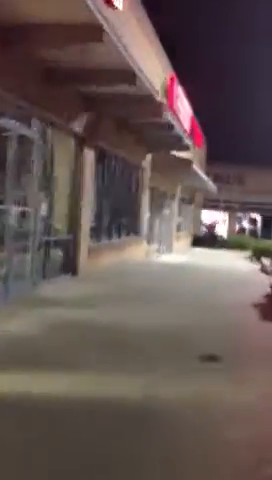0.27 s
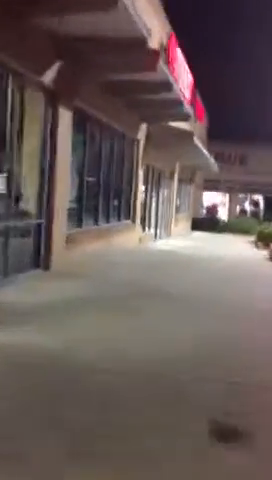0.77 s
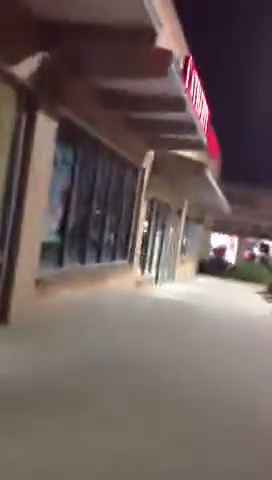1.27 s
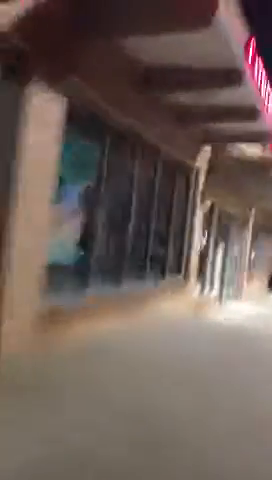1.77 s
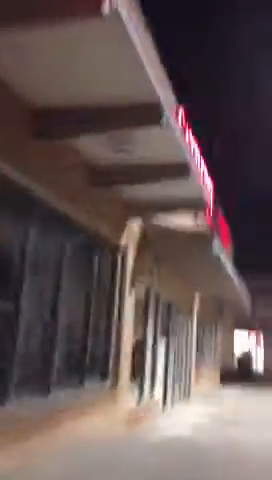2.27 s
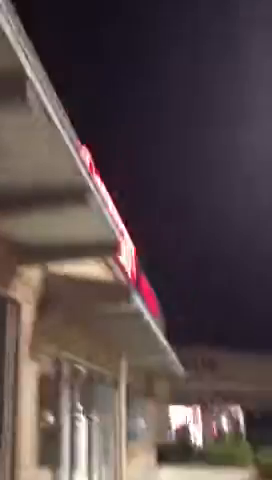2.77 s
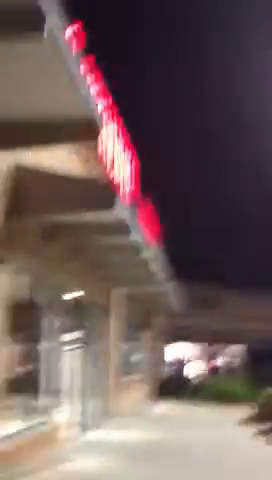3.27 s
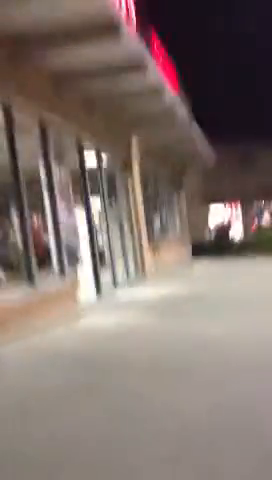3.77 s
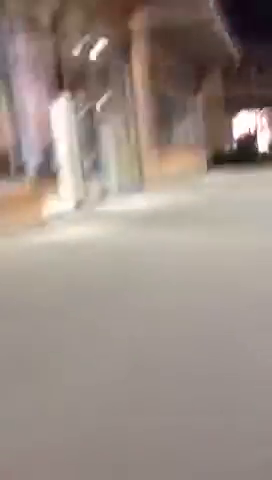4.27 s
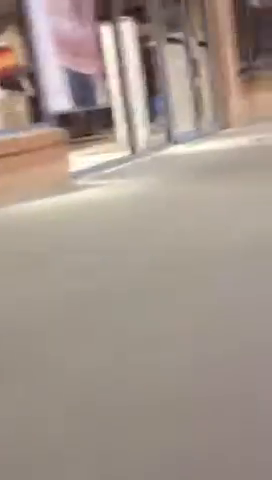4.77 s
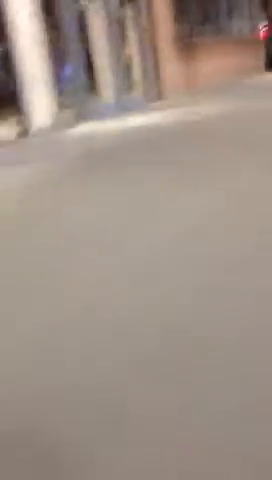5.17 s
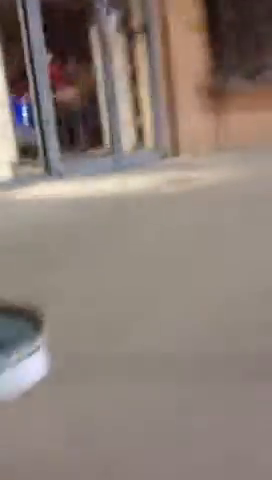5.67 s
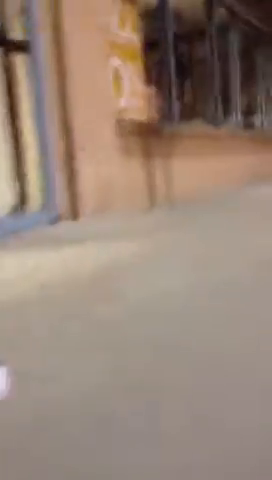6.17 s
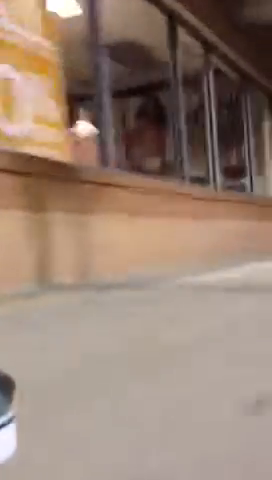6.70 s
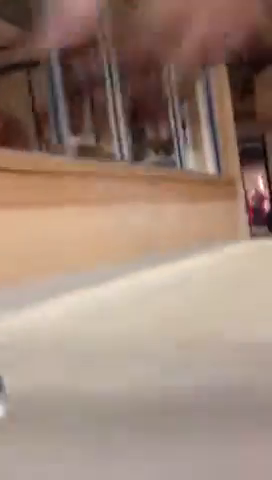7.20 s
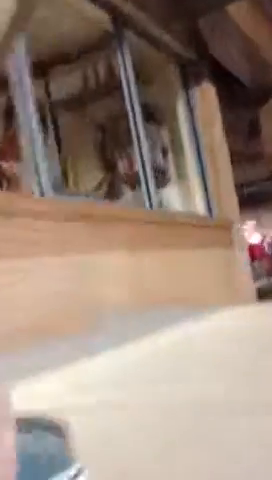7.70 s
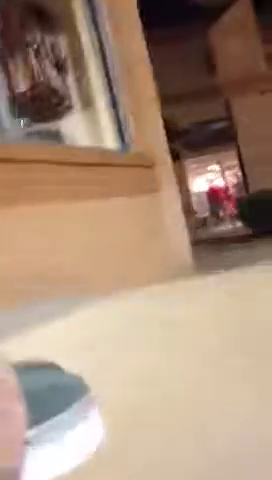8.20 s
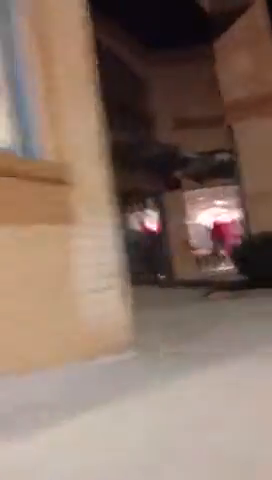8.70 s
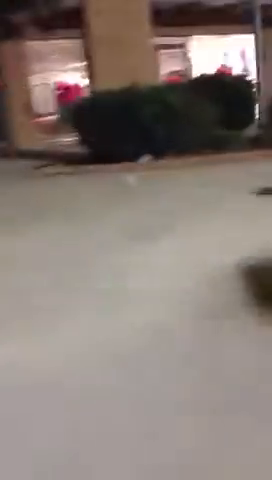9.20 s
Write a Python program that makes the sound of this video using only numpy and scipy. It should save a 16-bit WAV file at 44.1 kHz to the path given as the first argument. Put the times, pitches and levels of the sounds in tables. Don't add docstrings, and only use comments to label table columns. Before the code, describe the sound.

Close, hollow skateboard rolling on a concrete walkway, broken by paired clacks about every half second, with gritty pebble snaps and bright wheel hiss midway.

```python
import sys
import numpy as np
from scipy import signal
from scipy.fft import rfft, irfft, next_fast_len
from scipy.io import wavfile
from scipy.ndimage import uniform_filter1d, minimum_filter1d, map_coordinates

SR = 44100
rng = np.random.default_rng(int(sys.argv[2]) if len(sys.argv) > 2 else 0)


def inscribe(sig):
    pcm = np.round(np.clip(np.atleast_2d(sig).T, -1, 1) * 32767)
    wavfile.write(sys.argv[1], SR, pcm.astype(np.int16))


def gain_from_db(level_db):
    decades = np.asarray(level_db, float) / 20
    return 10 ** decades


N = 416744

# t/s, deck shaking level/dB, level of wheels turned to the microphone/dB
ROLL = [(0.0, -19.5, -1), (0.4, -23.5, -2), (0.75, -24, -1.5), (1.05, -26.5, -0.5), (1.8, -25, -1.5),
        (2.3, -26.5, 0.5), (2.9, -31.5, 2), (3.4, -28.5, 1), (3.8, -31.5, 6), (4.05, -29.5, 10.5),
        (4.6, -28.5, 14.5), (5.1, -27.5, 13.5), (5.7, -27.5, 15), (6.2, -22, 16), (6.6, -24, 11),
        (6.9, -21, 6.5), (7.2, -26.5, 4.5), (7.6, -27, -1.5), (8.5, -27.5, -6), (9.45, -28.5, -3.5)]
# t/s, crouch [0-1], open view of the bearings [0-1]
POSE = [(0, 0.37, 0.34), (1.2, 0.22, 0.03), (2.5, 0, 0.16), (3.6, 0.08, 0.46), (4.2, 0.23, 0.65),
        (5, 0.17, 0.73), (5.6, 0.6, 0.85), (6.3, 0.46, 1), (7.2, 0.88, 0.87), (7.6, 0.76, 0.9),
        (9.45, 1, 1)]
# t/s, level/dB, length/s
MAIN_SWELLS = [(0.132, 13.5, 0.017), (2.25, 1, 0.3), (5.806, 5, 0.019), (6.728, -14, 0.041),
               (8.86, 6, 0.033), (9.05, 1, 0.036), (9.17, 3.5, 0.032), (9.413, -1, 0.064), (8.453, 0, 0.11),
               (9.247, -2, .05), (0.6, -7, .05), (7.306, 4.5, 0.037)]

# f/Hz, bandwidth/Hz, level/dB
BOOM = [(190, 54, 0.5), (239, 24, -5.5)]
BELLY = [(248, 79, 4), (364.4, 56, 3.5)]
RING = [(510.5, 41, 1), (636, 129, 3.5), (774, 93, 6)]
MAIN = [(556, 52, 0)]
EDGE = [(754, 230, 1), (990, 215, 5), (1098, 63, 8), (1169, 77, -2.5)]
GRIND = [(1408, 276, 14.5), (1880, 140, -1.5), (2310, 4000, -4), (2840, 2730, 0)]
NOSE = [(1690, 300, -1.6), (1900, 160, -0.38)]
BEARING = [(4460, 270, -5), (4770, 350, 2)]
TRUCKS = [(4080, 850, 17.5), (7000, 5400, -6.5)]
SNAP = [(8000, 4700, 0.1), (13200, 2500, 0.1)]
STONE = [(4360, 470, 1), (6600, 810, 1), (7850, 910, -4.5), (13000, 1800, -11)]
CANOPY = [(2000, 450, 10.0), (4760, 2400, -2.5), (7400, 2300, 0.0)]
AIR = [(60, 70, 0)]
SOLE = [(8100, 750, 0)]

# f/Hz, level/dB
FAR = [(1940, -25), (3300, -15), (4030, -4), (4700, -2), (7460, 3.5), (9100, -1), (9700, -9), (11800, -8),
       (14600, -11.5), (15300, -16)]
# f/Hz, level/dB
NEAR = [(1940, -32), (3400, -7.5), (4100, -4), (4850, 1), (5300, -11), (5700, -8.5), (6300, -9),
        (8260, -13), (10000, -20), (12000, -12.5), (13400, -13.5), (15300, -17.5)]
# f/Hz, t60/s
WALL = [(200, .2), (2000, .14), (5000, .05), (10000, .03)]

# t/s, blow level/dB, wheel crack over the blow/dB, second wheel delay/ms, its level/dB
FRONT = [(0.0096, -1.5, -10.5, 4.5, 0), (0.5359, -5.5, -12.5, 5, 0), (1.1245, -8, -15, 3.53, 2.5),
         (1.7459, -5.5, -14, 3.5, -2), (2.3627, -12, -7, 3.38, -4.5), (3.501, -9, -9.5, 2.62, 0),
         (4.3598, -10, -6, 3.9, -6.5), (5.1345, -13, -5.5, 1.97, -7), (5.8306, -6.5, -6.5, 3.7, -0.5),
         (6.6004, -9, 0.5, 2.76, 0), (7.2993, -8.5, 3, 4.84, 4), (8.059, -7.5, -10, 3.45, 1.5),
         (8.6886, -3.5, -10.5, 8.2, -1.5)]
# t/s, blow level/dB, wheel crack over the blow/dB, second wheel delay/ms, its level/dB
REAR = [(0.1205, -5.5, -11.5, 3.54, 3.5), (0.6512, -8.5, -14, 4.5, 0), (1.2438, -8, -16, 3.4, -2),
        (1.8701, -5.5, -17.5, 3.05, 1), (2.4894, -12, -12, 1.33, 0), (3.6406, -6.5, -22, 1.3, 2.5),
        (4.5127, -6, -4.5, 1.63, 2.5), (5.257, -6, -5.5, 1.41, 2), (5.9443, -3.5, -3, 3.6, 1),
        (6.7269, -10, -1.5, 2.03, 1.5), (7.4261, -8, -7.5, 4.14, 3.5), (8.1889, -6.5, -9, 4.23, -1.5),
        (8.8281, -2.5, -13.5, 9.3, -3)]
# t/s, snap level/dB, low modes level/dB, main mode level/dB, snap top level/dB
TONE = [(0.0154, -43, -8, -2, 0.1), (0.1214, -50, 1, 2.5, 0.1), (0.5364, -50, -2, -10, 0.1),
        (0.6514, -50, 5, -0.5, -8), (1.1254, -51, 2, -3, 0.1), (1.2456, -46, -8, 2, 2),
        (1.7469, -44, 2, 2, 0.1), (1.8716, -42, 3, -6.5, 0.1), (2.3634, -45, 8, 6.5, 0.1),
        (2.4912, -33, -4, -1, 0.1), (3.5024, -38, 3, -9, 0.1), (3.6411, -52, -7, -1, -2),
        (4.3605, -49, 4.5, 2.5, -2), (4.5146, -18, 0.1, 2.5, 0.1), (5.1362, -24, 6.5, -0.5, -3),
        (5.2584, -19, -3, -6, -1), (5.8311, -18, 2, 1, 2), (5.9459, -37, 2, 0.1, -4),
        (6.6034, -26, 4, -2, 5), (6.7286, -48, 4.5, 0.1, -2), (7.2998, -28, 0.1, 10, 5),
        (7.4274, -40, -3, 4, 5), (8.0591, -31, 0.1, -2, 0.1), (8.1913, -42, 3, -2, 0.1),
        (8.6892, -33, 4, 2, 1), (8.8288, -44, 0.1, 2.5, -1)]
# rattle level/dB, canopy scatter level/dB, belly level/dB
LOOSE = [(-5, 7.5, 2), (-11, 6, 7), (-9, 4, .1), (-4, 4, 13.5), (-11, 0, 11), (-13, 3.5, 2), (-18, -1, 4),
         (-13, -1, 8), (-1.5, 3.5, 5), (5, 4.5, 29), (0, 1, 4), (8, -6, 3), (-2.5, 4, 16), (0, -2, -5),
         (8, 11, 6), (-5, -3, -15), (3.5, 7, -5), (-3, .1, -10), (-4, 8, 7), (1.5, 3, 25), (-3, -5, -3),
         (5.5, -8, 7), (-1.5, -9, 2), (-0.5, -4, 10), (-8, -5, -1), (-2, -9, 2)]
# f/Hz, level/dB, second f/Hz, second level/dB
RINGING = [(1750, -14, 2800, -37), (2430, -36, 3300, -37), (1810, -17, 2570, -31), (2780, -44, 4770, -52),
           (2600, -49, 4700, -49), (1870, -34, 2460, -29), (1710, -18.5, 2760, -31), (2790, -34, 1930, -34),
           (1380, -22.5, 1640, -25), (2380, -25.5, 6000, -40), (2260, -43, 1000, -24),
           (905, -17.5, 1390, -31.5), (1810, -17.5, 3300, -32), (4800, -32, 3500, -36),
           (2750, -19.5, 4460, -19), (1790, -26, 4700, -20), (2830, -15.5, 1100, -8.5),
           (4500, -26, 1050, -9), (2360, -26, 4800, -32), (3140, -12, 7200, -23), (1450, -12, 2410, -13),
           (2130, -18.5, 1820, -22), (1400, -20, 3200, -35), (2090, -30, 3100, -43), (3900, -41, 2400, -40),
           (3120, -39, 4440, -47)]
JOLTS = [-75, -68.5, -48.5, -70, -57, -54, -37, -54, -55, -48, -55, -53, -61, -62, -50.5, -43, -63, -57,
         -56, -44, -58, -48, -51, -39, -47, -44.5]
# f/Hz, level/dB, t60/s
STRUCK = [(228, -20, 0.1), (321, -15.5, 0.051), (540, -34, 0.035), (560, -1, 0.059), (665, 4, 0.024),
          (794, 2.5, 0.03), (908, 4.5, 0.022), (1073, -4.5, 0.042), (1440, -45, 0.0074), (1835, -18, 0.064)]
# t/s, grind level/dB, blow level/dB, tick level/dB, tick f/Hz
PEBBLES = [(0.5182, -44, 8, -57, 3610), (1.544, -41, 4, -2, 3960), (1.553, -53, 31, -22, 7900),
           (2.2026, -35.5, 19, -45, 3710), (2.31, -37, 22, -11, 2300), (2.708, -36, 21, -9, 8140),
           (3.489, -35, 4, -42, 4650), (4.4574, -29, 15, 15, 6330), (4.6062, -35.5, 23, 4, 4400),
           (4.8452, -42, 17, -30, 1900), (5.7404, -38, -16, -8, 2700), (4.484, -46, 5, 15, 4830),
           (4.4675, -50, 5, 19, 7000), (4.4925, -50, 5, 18, 6000), (4.33, -40, 2, -10, 2600),
           (5.6012, -43, 5, -12, 2600), (6.8229, -34, 5, -12, 2600), (6.99, -37, 3, -12, 2600),
           (7.0678, -43, 5, -12, 2610), (2.7501, -48, 5, -8, 2600), (4.0881, -48, 5, -10, 2600),
           (4.5431, -46, 5, -12, 2600), (5.525, -47, 5, 11, 5000)]
# t/s, level/dB, length/s
GUSTS = [(1.25, -65, .1), (1.55, -52, 0.023), (2.05, -54, 0.1), (2.72, -55, 0.088), (1.66, -52, 0.1),
         (3.74, -70, 0.12), (3.1, -79, .3), (3.7, -66, 0.11), (14, -57, 0.06), (7, -51, 0.19),
         (4.7, -55, 0.083), (9.265, -63, 0.027), (3.9, -67, 0.14), (8.0, -69, 0.123)]
# t/s, level/dB
SCUFF = [
    (2.1, -91),
    (2.3, -59),
    (2.55, -56),
    (2.75, -56.5),
    (2.85, -94),
]
# t/s, level/dB, length/s
HUMS = [
    (9.405, -21, 0.045),
    (6.5, -14.5, 0.025),
    (9.03, -35, 0.022),
    (7.1, -41, .02),
    (2.25, -36, 0.065),
]

BOOM_DB, BOOM_CROUCH_DB = -1.5, -4
BELLY_DB, BELLY_FOLLOWS = 0, -0.27
FREE_DB, FREE_CROUCH_DB = -1, 0.5
GRIND_DB, GRIND_FOLLOWS, GRIND_CROUCH_DB = -22.5, 0.47, 5.5
NOSE_DB, NOSE_CROUCH_DB = -26.5, -20
HISS_DB, BEARING_DB = -30, -12.5
RATTLE_DB, RATTLE_FOLLOWS, RATTLE_CROUCH_DB = -26, 1, 1.5
WHEEL_HZ, WHEEL_SPREAD_HZ = 2350, 150
LIFT, LIFT_S = 0.33, 0.00053
SNAP_DB, SNAP_S = 13, 0.013
RINGING_S, RINGING_LATE_S = 0.016, 0.002
CALM_DB = -78
JOLT_DB, JOLT_HZ, JOLT_S = -5, 60, 0.011
HUM_HZ = 556
TOP_HZ = 15280
CLACKS = sorted(FRONT + REAR)


def unit(x):
    return x / np.sqrt(np.mean(x ** 2) + 1e-20)


def along(points, hz):
    f, v = np.transpose(points)
    return np.interp(np.log(hz + 1), np.log(f + 1), v)


def curves(rows):
    s, *cols = np.transpose(rows)
    return [np.interp(np.arange(N) / SR, s, c) for c in cols]


def hand():
    return np.clip(curves(POSE), 0, 1)


def wobble(rate):
    return map_coordinates(rng.standard_normal(int(N * rate / SR) + 4), [np.arange(N) * rate / SR])


def filtered(x, response):
    m = next_fast_len(N + SR // 8)
    return irfft(rfft(x, m) * response(np.fft.rfftfreq(m, 1 / SR)), m)[..., :N]


def modes(table, low_hz, high_hz):
    def edge(u):
        return 1 / (1 - u * u + 1j * np.sqrt(2) * u)

    def response(f):
        peaks = 0
        for k, (centre, width, db) in enumerate(table):
            resonance = 1j * f * width / (centre * centre - f * f + 1j * f * width)
            peaks = peaks + (-1) ** k * gain_from_db(db) * resonance
        high_pass = (edge(f / low_hz) * (f / low_hz) ** 2) ** 2
        return peaks * edge(f / high_hz) * high_pass

    return response


def shaken(force, table, low_hz, high_hz):
    return unit(filtered(force, modes(table, low_hz, high_hz)))


def place(track, s, sound):
    track[round(s * SR):][:len(sound)] += sound


def ground(bumps_db, grit_db, patchy_db):
    z = signal.stft(rng.standard_normal(N), nperseg=1024)[2]
    field = uniform_filter1d(rng.standard_normal(z.shape), size=5, axis=0)
    field = uniform_filter1d(field, size=16, axis=1)
    noise = signal.istft(z * gain_from_db(patchy_db * unit(field)), nperseg=1024)[1][:N]
    return noise * gain_from_db(bumps_db * wobble(35) + grit_db * wobble(260))


def rolling():
    ring_db, facing_db = curves(ROLL)
    crouch, view = hand()
    t = np.arange(N) / SR
    front = ground(bumps_db=1.54, grit_db=1.2, patchy_db=1.94)
    rear = ground(bumps_db=1.54, grit_db=1.2, patchy_db=1.94)
    fizz = ground(bumps_db=0.9, grit_db=1.3, patchy_db=1.2)

    boom_db = ring_db + BOOM_DB + BOOM_CROUCH_DB * crouch
    belly_db = boom_db + BELLY_DB + BELLY_FOLLOWS * facing_db
    boom = gain_from_db(boom_db - 4.5) * shaken(rear, BOOM, low_hz=121.0, high_hz=306)
    belly = gain_from_db(belly_db) * shaken(front, BELLY, low_hz=205, high_hz=480)

    free_db = FREE_DB + FREE_CROUCH_DB * crouch
    for s, db, long in MAIN_SWELLS:
        free_db = free_db + db * np.exp(-((t - s) / long) ** 2)
    ring = gain_from_db(-3.0 - 5.3 * crouch) * shaken(front, RING, low_hz=343, high_hz=1150)
    main = gain_from_db(free_db - 4 + 0.4 * wobble(8.2)) * shaken(rear, MAIN, low_hz=224, high_hz=1160)
    edge = gain_from_db(-13.5 + 9.5 * crouch) * shaken(rear, EDGE, low_hz=457, high_hz=1360)
    deck = gain_from_db(ring_db + 2.5) * (ring + main + edge)

    grind_db = ring_db + GRIND_DB + GRIND_FOLLOWS * facing_db + GRIND_CROUCH_DB * crouch
    nose_db = ring_db + NOSE_DB + NOSE_CROUCH_DB * crouch
    grind = gain_from_db(grind_db + 2.5) * shaken(3.1 * front + fizz, GRIND, low_hz=940, high_hz=3900)
    nose = gain_from_db(nose_db) * shaken(front, NOSE, low_hz=1400, high_hz=1950)

    far = unit(filtered(fizz, lambda hz: gain_from_db(along(FAR, hz))))
    near = unit(filtered(fizz, lambda hz: gain_from_db(along(NEAR, hz))))
    near = near + gain_from_db(BEARING_DB) * shaken(fizz, BEARING, low_hz=3270, high_hz=5600)
    hiss = gain_from_db(ring_db + HISS_DB + facing_db + 1.5) * (view * near + (1 - view) * far)
    return boom + belly + deck + grind + nose + hiss


def moving_air():
    t = np.arange(N) / SR
    swell = gain_from_db(CALM_DB) + sum(gain_from_db(db) * np.exp(-((t - s) / long) ** 2) for s, db, long in GUSTS)
    lumps = rng.standard_normal(N) * gain_from_db(2.5 * wobble(14))
    return swell * shaken(lumps, AIR, low_hz=20, high_hz=110)


def contacts():
    rattle_over_db = RATTLE_DB + RATTLE_FOLLOWS * np.maximum(curves(ROLL)[1], 0) + RATTLE_CROUCH_DB * hand()[0]
    events = []  # t/s, push, grind, rattle and note level/dB, note f/Hz, colour levels/dB
    for (s, db, crack, late_ms, late_db), tone, (loose, scatter_db, belly_db) in zip(CLACKS, TONE, LOOSE):
        hz = WHEEL_HZ + WHEEL_SPREAD_HZ * rng.standard_normal()
        crack_db = db + crack
        rattle_db = crack_db + loose + rattle_over_db[round(s * SR)]
        colour = (*tone[1:], scatter_db, belly_db)
        first_s = s + 0.0008
        second_s = first_s + late_ms / 1000
        events.append((first_s, db, crack_db, rattle_db, crack_db, hz, colour))
        events.append((second_s, db + late_db, crack_db - 6.0, rattle_db - 0.5, crack_db - 0.5, hz, colour))
    for s, db, blow, tick, hz in PEBBLES:
        events.append((s, db + blow - 10.0, db + 2.5, -120, db + tick - 19.0, hz, (-120, 0, -1, 0, 4, 0)))
    return events


def struck_deck(t, jitter, low_db, main_db, belly_db):
    ring = np.zeros(len(t))
    for k, (f, db, t60) in enumerate(STRUCK):
        if k == 0:
            colour_db = low_db
        elif f < 400:
            colour_db = low_db + belly_db
        else:
            colour_db = main_db if f < 600 else 0
        level_db = db + colour_db + 3.1 * np.clip(jitter[k], -1.3, 0.9)
        ring += np.sign(400 - f) * gain_from_db(level_db - 60 * t / t60) * np.sin(2 * np.pi * f * t)
    return ring


def clacks():
    deck, grind, note, rattle, echo, snap, top = np.zeros((7, N + SR))
    t = np.arange(SR // 14) / SR
    soft = t / 0.00018 * np.exp(1 - t / 0.00019)
    struck = np.interp(t - LIFT_S, t, soft, left=0)
    rise = 1 - np.exp(-t / 0.002)
    scatter = t / 0.017 * np.exp(1 - t / 0.017) * (1 - t / t[-1])
    for s, push_db, grind_db, rattle_db, note_db, hz, colour in contacts():
        snap_db, low_db, main_db, top_db, scatter_db, belly_db = colour
        a, b, c, d = rng.standard_normal((4, len(t)))
        push = struck - LIFT * soft + 0.17 * a * gain_from_db(-60 * t / 0.051)
        ring = struck_deck(t, d, low_db, main_db, belly_db)
        place(deck, s, gain_from_db(push_db) * signal.fftconvolve(push, ring)[:len(t)])
        place(grind, s, gain_from_db(grind_db) * rise * b * gain_from_db(-60 * t / 0.028))
        tone = np.sin(2 * np.pi * hz * t[:300]) * gain_from_db(-60 * t[:300] / 0.0025)
        burst = rise * b * gain_from_db(-60 * t / 0.021)
        place(note, s, gain_from_db(note_db) * signal.fftconvolve(burst, tone)[:len(t)])
        place(rattle, s, gain_from_db(rattle_db) * rise * c * gain_from_db(-60 * t / 0.014))
        snap_fall = rise * gain_from_db(snap_db + SNAP_DB - 60 * t / SNAP_S)
        place(snap, s, snap_fall * a)
        place(top, s, gain_from_db(top_db) * snap_fall * c)
        place(echo, s, gain_from_db(push_db + scatter_db) * d * scatter)
    body = gain_from_db(-27.5) * signal.sosfilt(signal.butter(3, 140, "high", fs=SR, output="sos"), deck[:N])
    wheels = gain_from_db(13.0) * filtered(grind[:N], modes(GRIND, low_hz=920, high_hz=3730)) + gain_from_db(-12.0) * note[:N]
    trucks = gain_from_db(16) * filtered(rattle[:N], modes(TRUCKS, low_hz=2540, high_hz=14700))
    tyre = filtered(snap[:N], modes(SNAP[:1], low_hz=5900, high_hz=11000))
    tyre = tyre + gain_from_db(3.5) * filtered(top[:N], modes(SNAP[1:], low_hz=9500, high_hz=16900))
    canopy_db = -24.5 - 14 * hand()[0]
    canopy = gain_from_db(canopy_db) * filtered(echo[:N], modes(CANOPY, low_hz=1300, high_hz=9200))
    return body + wheels + trucks + tyre + canopy


def ringing_wheels():
    note = np.zeros(N + SR)
    t = np.arange(SR // 14) / SR
    fall = gain_from_db(28.0 - 60 * t / RINGING_S) * (1 - np.exp(-t / 0.00067))
    for (s, *_), (hz, db, hz2, db2) in zip(CLACKS, RINGING):
        pair = gain_from_db(db) * np.sin(2 * np.pi * hz * t) + gain_from_db(db2) * np.sin(2 * np.pi * hz2 * t)
        place(note, s + RINGING_LATE_S, fall * pair)
    return gain_from_db(-12.0) * note[:N]


def hand_jolts():
    t, jolts = np.arange(SR // 20) / SR, np.zeros(N)
    for (s, *_), db in zip(TONE, JOLTS):
        jolts[round(s * SR)] = gain_from_db(db + JOLT_DB)
    thump = np.exp(-((t - JOLT_S) / JOLT_S) ** 2) * np.sin(2 * np.pi * JOLT_HZ * t)
    return signal.fftconvolve(jolts, thump)[:N]


def walls(x):
    hz, t, z = signal.stft(rng.standard_normal(SR // 3), SR, nperseg=256)
    tail = signal.istft(z * gain_from_db(-60 * t / along(WALL, hz)[:, None]), SR, nperseg=256)[1]
    delayed = np.pad(x, (400, 0))
    return signal.fftconvolve(delayed, tail / np.linalg.norm(tail))[:N]


def stone_chips():
    chips = np.zeros(N + SR)
    t = np.arange(SR // 14) / SR
    for s, db, _, tick_db, _ in PEBBLES:
        place(chips, s, gain_from_db(db + tick_db - 60 * t / 0.013) * rng.standard_normal(len(t)))
    return gain_from_db(14.5) * filtered(chips[:N], modes(STONE, low_hz=3600, high_hz=15000))


def scuff():
    return gain_from_db(curves(SCUFF)[0]) * shaken(rng.standard_normal(N), SOLE, low_hz=6000, high_hz=9400)


def hum():
    t = np.arange(N) / SR
    swell = sum(gain_from_db(db) * np.exp(-((t - s) / long) ** 4) for s, db, long in HUMS)
    return swell * gain_from_db(0.97 * wobble(45)) * np.sin(2 * np.pi * HUM_HZ * t + 1.0 * wobble(30))


def scene():
    hits = clacks() + ringing_wheels() + stone_chips()
    echoes = gain_from_db(-21.5) * walls(hits)
    hiss = gain_from_db(-73.0) * rng.standard_normal(N)
    return (rolling() + moving_air() + hits + hand_jolts() + echoes + scuff() + hum() + hiss)[None]


def band_limit(x):
    return signal.sosfilt(signal.butter(12, 15990, fs=SR, output="sos"), x)


def record(dry):
    need_db = np.minimum(0, -3.2 - 20 * np.log10(np.abs(dry[0]) + 1e-9))
    climb_db = 22 * np.arange(N) / SR
    held_db = climb_db + np.minimum.accumulate(need_db - climb_db)
    ahead_db = uniform_filter1d(minimum_filter1d(held_db, size=65), size=33)
    levelled = dry * gain_from_db(np.minimum(ahead_db, 0)) + gain_from_db(-69.5) * rng.standard_normal(N)

    def band(hz):
        return np.where(hz < TOP_HZ, 1, gain_from_db(np.maximum(-20 - (hz - TOP_HZ) / 4, -44)))

    return band_limit(filtered(levelled, band))


dry = scene()
out = record(dry)
inscribe(out)
```